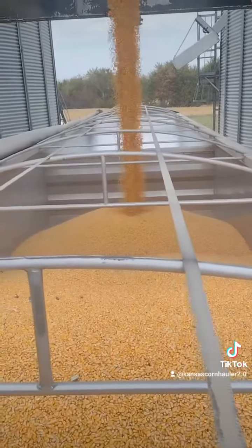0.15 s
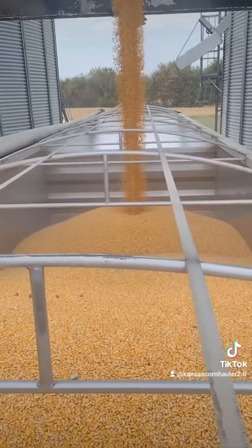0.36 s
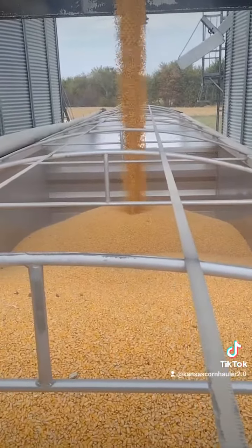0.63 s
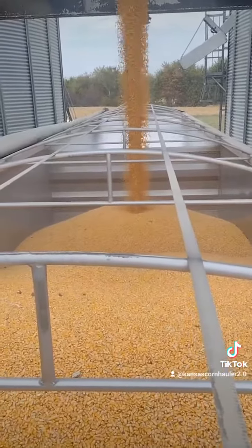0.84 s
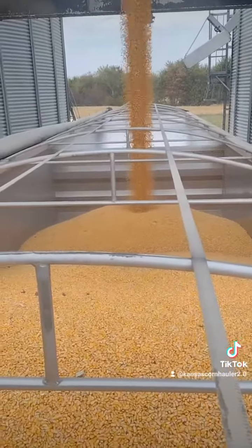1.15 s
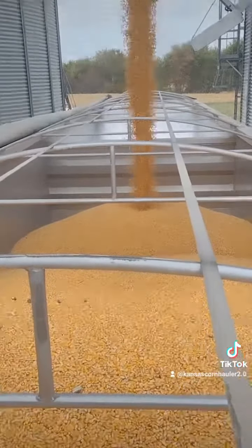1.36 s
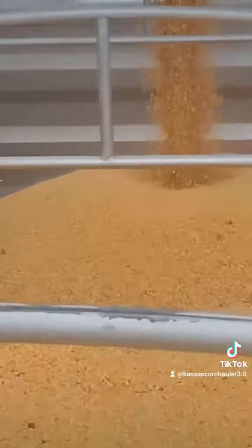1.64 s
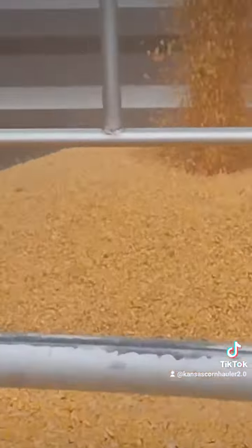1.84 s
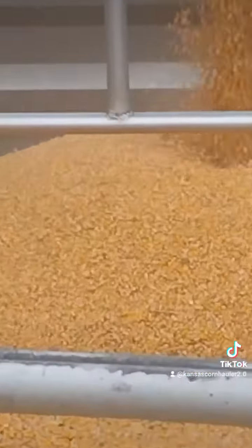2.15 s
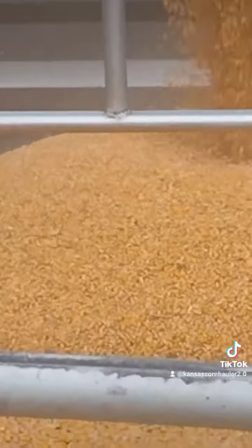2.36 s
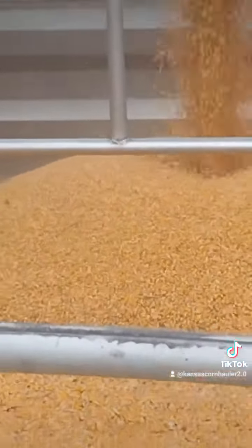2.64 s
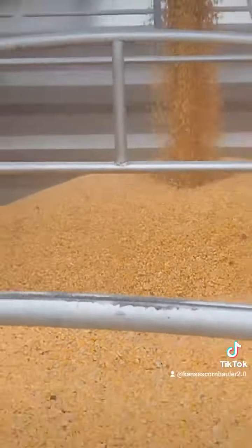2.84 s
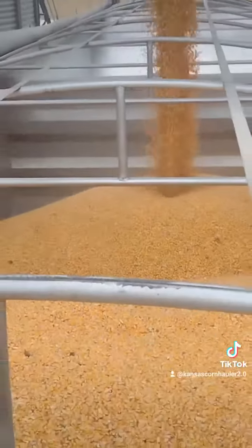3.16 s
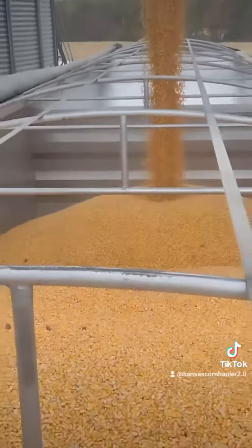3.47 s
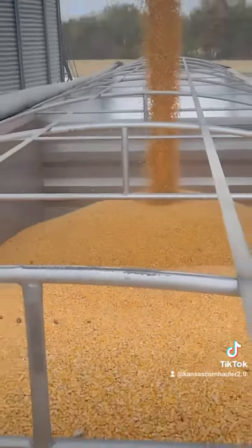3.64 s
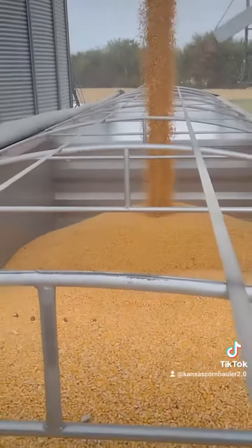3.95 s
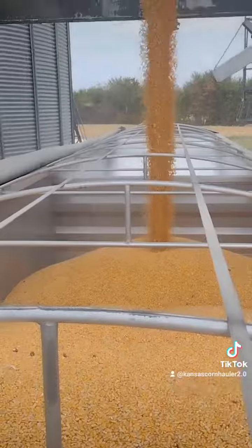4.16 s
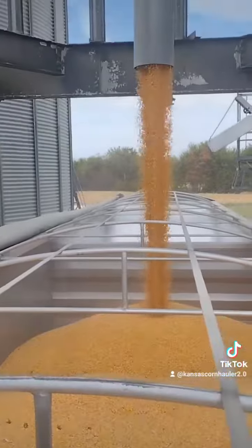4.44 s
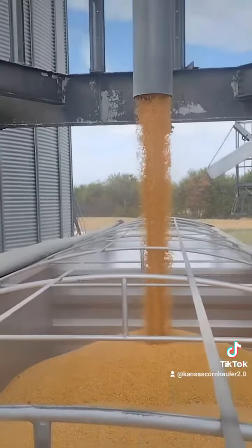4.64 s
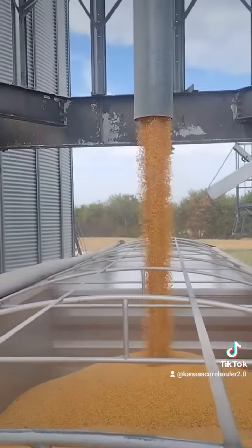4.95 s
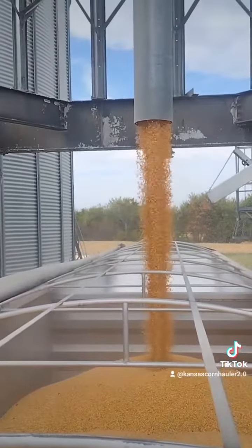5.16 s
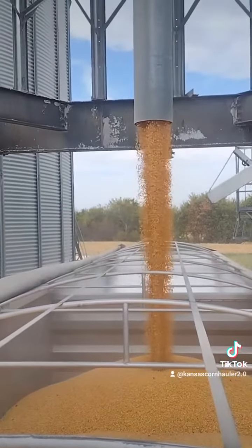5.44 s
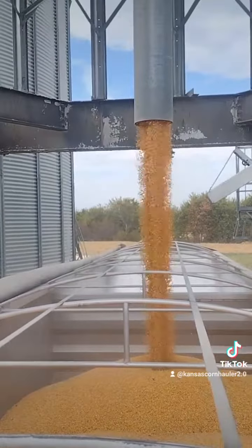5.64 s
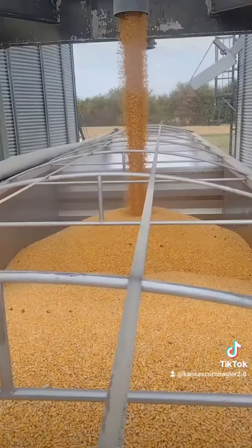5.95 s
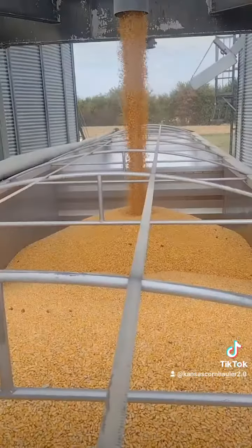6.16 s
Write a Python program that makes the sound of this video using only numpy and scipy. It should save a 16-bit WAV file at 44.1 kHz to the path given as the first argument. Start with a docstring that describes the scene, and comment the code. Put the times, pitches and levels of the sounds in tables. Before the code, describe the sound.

Dry corn kernels pour in a steady rushing hiss onto a heap in a metal trailer, with low engine drone, a brief silence, then a stronger return.

```python
"""Shelled corn falls from an overhead spout onto the heap in a metal grain trailer: kernels click and hiss, the
stream drums the heap and walls, two engines and a conveyor drone behind. The whole scene starts loud with heavy
surges and sinks to a calm level by 1.8 s; stray kernels tick on a rail. Around 4 s the microphone is raised
from the heap towards the spout. At 5.5 s the sound drops out, then it swells back louder. Sources are shaped
noise, random impacts and sines."""
import sys
import numpy as np
from scipy.fft import rfft, irfft, next_fast_len
from scipy.io import wavfile
from scipy.ndimage import map_coordinates

SR = 44100
rng = np.random.default_rng(int(sys.argv[2]) if len(sys.argv) > 2 else 0)


def put_to_file(sound):
    """Save the sound as 16-bit audio at rate SR, in the file named by the first command-line argument."""
    columns = np.atleast_2d(sound).T  # one column per channel
    safe = np.clip(columns, -1, 1)
    whole_steps = np.round(safe * 32767)
    wavfile.write(sys.argv[1], SR, whole_steps.astype(np.int16))


N = 277918

# Spectra of kernels ploughing, clicking and skittering: (frequency [Hz], relative density [dB])
RUSH_SPECTRUM = [(350, -16.5), (560, -1), (800, -0.5), (950, -1.7), (1450, -1.8), (1900, -4.5), (2300, -8),
                 (2800, -8.5), (3400, -16.5), (5000, -39.5)]
PATTER_SPECTRUM = [(1800, -40), (2800, -2), (3400, 0), (4000, 2), (5100, 1), (6000, 1.5), (7000, -3),
                   (10000, -32)]
HISS_SPECTRUM = [(4500, -45.5), (5600, -15), (6100, -6.5), (6750, -3.5), (7600, -4.5), (8600, -2.5),
                 (9700, -4.5), (12000, -1.5), (13500, -0.5), (14400, 0.5), (15200, 1.5)]
RUSH_FLUTTER_DB, PATTER_FLUTTER_DB, HISS_FLUTTER_DB = 0.68, 1.1, 0.62
SWAY_BEFORE_DB, SWAY_AFTER_DB = 1.3, 5.5  # L-R of the finest hiss, before and after the gap


def kernels():
    """Kernels plough into the heap, click on each other and skitter down the slope."""
    flow = wobble(rate_hz=45)  # the stream falls in slightly uneven clumps
    rush = shower(RUSH_SPECTRUM, rate_hz=2000, spread_db=3.0, slide_db=-2)
    rush = rush * amp(level("rush") + RUSH_FLUTTER_DB * flow)
    patter = shower(PATTER_SPECTRUM, rate_hz=2500, spread_db=3.5, slide_db=2.5)
    patter = patter * amp(level("patter") + PATTER_FLUTTER_DB * flow)
    hiss = shower(HISS_SPECTRUM, rate_hz=8000, spread_db=3.5, slide_db=0.0)
    hiss = swayed(hiss * amp(level("hiss") + HISS_FLUTTER_DB * flow))
    coarse = reflections(rush + patter, echo_db=-4, reach_s=0.04, count=16)
    return coarse + reflections(hiss, echo_db=-12.5, reach_s=0.02, count=12)


def swayed(hiss):
    """The shortest waves favour one side or the other as the microphone turns."""
    sway_db = np.where(after_gap(), SWAY_AFTER_DB, SWAY_BEFORE_DB)
    fine = filtered(hiss, lambda hz: np.interp(hz, [10000, 11060, 14100, 15040], [0, 1, 1, 0]))
    return hiss + fine * (amp(np.array([sway_db, -sway_db]) / 2) - 1)


WANDER_MS = 0.35


def reflections(x, echo_db, reach_s, count):
    """Bare metal sides return weak early copies; the hand-held microphone wanders, so the comb moves."""
    out = x.copy()
    hand = wobble(rate_hz=1) * WANDER_MS * SR / 1000  # samples
    echo_gain = amp(echo_db) / np.sqrt(count)
    for side, direct in zip(out, x):
        for place, heading, sign in rng.uniform([0.1, -1, -1], [1, 1, 1], (count, 3)):
            delay = np.rint(place * reach_s * SR + heading * hand).astype(int)
            heard = np.arange(N) - delay
            copy = direct[heard.clip(0, N - 1)] * (heard >= 0)
            side += np.sign(sign) * echo_gain * copy
    return out / np.sqrt(1 + amp(2 * echo_db))


# Spectrum of the falling stream: (frequency [Hz], relative density [dB])
STREAM_SPECTRUM = [(500, -24), (1000, 9), (2000, 3), (3400, -3), (4400, -10.5), (5300, -13), (6500, 2),
                   (9000, 4), (15000, 10)]
# Lag of the left port as the microphone tilts: (time [s], lag [ms])
PORT_LAG = [(0.8, 0.014), (1.5, -0.0059), (3.4, -0.037), (4.0, 0.035), (4.2, 0.095), (4.6, 0.12),
            (5.5, 0.11), (5.86, -0.036)]


def stream():
    """Kernels jostle as they leave the spout; both ports hear the same sound at slightly shifted times."""
    blows = impacts(rate_hz=3700, spread_db=2)[0]
    jostle = unit(filtered(blows, lambda hz: amp(along(STREAM_SPECTRUM, hz))))
    lag_ms, = curves(PORT_LAG)
    left = map_coordinates(jostle, [np.arange(N) - lag_ms * SR / 1000], order=5)
    return amp(level("stream")) * np.array([left, jostle])


# Spectrum of the nearest kernels: (frequency [Hz], relative density [dB])
CRACKLE_SPECTRUM = [(900, -23.5), (1800, -6.5), (2700, 5.5), (3500, -15), (4500, -3), (6500, -1),
                    (10000, -1)]


def crackle():
    """Kernels bouncing off the heap nearby click one by one above the hiss."""
    clicks = impacts(rate_hz=220, spread_db=5)
    return amp(level("crackle")) * spread(clicks, lambda hz: amp(along(CRACKLE_SPECTRUM, hz)))


# Spectra of heap thud and box body: (frequency [Hz], relative density [dB])
HEAP_SPECTRUM = [(20, -14), (40, -21), (50, -15), (60, -10.5), (78, -1), (100, -5), (125, -5), (170, -13),
                 (300, -53.5)]
BODY_SPECTRUM = [(80, -24), (120, -2), (145, -3), (180, 1), (225, -2.5), (280, -2.5), (345, -9.5),
                 (440, -7), (520, -12.5), (650, -22.5), (1000, -49.5)]
SURGE_DRUM = 0.22  # share of a surge's dB that reaches the walls


def trailer():
    """Clumps in the stream thud on the heap and set the metal box drumming."""
    surge_db = surges()
    thud = shower(HEAP_SPECTRUM, rate_hz=500, spread_db=1, slide_db=0.5)
    body = amp(-1.5) * shower(BODY_SPECTRUM, rate_hz=900, spread_db=3.0, slide_db=-1)
    ring = amp(-5.0) * spread(impacts(rate_hz=1200, spread_db=2), walls)
    drum = amp(level("drum") + SURGE_DRUM * surge_db) * (body + ring)
    return amp(level("thud") + surge_db) * thud + drum


# Resonances of panels and hold: (centre [Hz], width [Hz], relative level [dB])
WALL_MODES = [(108, 15, -6.5), (147, 15, -2.5), (231.4, 16, -2.5), (292, 12, -4.5), (386.4, 24, -5),
              (440, 23.3, -2.5)]


def walls(hz):
    """Summed band-pass resonances of the trailer's panels and hold."""
    total = 0
    for centre_hz, width_hz, db in WALL_MODES:
        damping = 1j * hz * width_hz
        total = total + amp(db) * damping / (centre_hz ** 2 - hz ** 2 + damping)
    return total


# Momentary thickening of the stream: (time [s], length between 1/e points [s], extra thud [dB])
SURGES = [(0.117, 0.14, 5), (0.338, 0.09, 10.5), (0.436, 0.068, 6.5), (0.645, 0.19, 1.5), (2.2, 0.09, 6.5),
          (2.484, 0.059, 11), (3.6, 0.25, 2), (3.862, 0.3, 9), (5.445, 0.08, 7), (6.242, 0.15, 9)]


def surges():
    """Each heavy clump is a bell-shaped swell, in dB."""
    t = np.arange(N) / SR
    return sum(db * np.exp(-(2 * (t - s) / length_s) ** 2) for s, length_s, db in SURGES)


# Dense clumps knocking on the heap: (time [s], pitch [Hz], level before attack and decay [dB])
CLUMPS = [(0.044, 163, -6), (0.363, 162, -13), (2.191, 144, -13), (2.493, 89, -18), (3.262, 207, -15.5),
          (3.651, 146, -15), (3.871, 81, -11), (6.075, 219, -11.5), (6.222, 161, -4.5), (6.276, 155, -5.5)]
CLUMP_ATTACK_S, CLUMP_T60_S = 0.0015, 0.071


def clumps():
    """A dense clump lands with one soft, quickly damped knock: a decaying sine."""
    out = np.zeros(N + SR)
    t = np.arange(SR // 5) / SR
    attack = 1 - np.exp(-t / CLUMP_ATTACK_S)
    for s, hz, db in CLUMPS:
        decay = amp(db - 60 * t / CLUMP_T60_S)
        out[round(s * SR):][:len(t)] += decay * attack * np.sin(2 * np.pi * hz * t)
    return out[:N]


# Stray kernels on a rail: (time [s], pitch [Hz], level before attack and decay [dB])
TICKS = [(2.3266, 11200, -14), (2.3974, 11000, -14), (2.9084, 10900, -18), (3.9345, 11000, -16.5)]
TICK_ATTACK_S, TICK_T60_S = 0.00043, 0.0095


def ticks():
    """A stray kernel glances off a rail with a tiny high ring."""
    out = np.zeros(N)
    for s, hz, db in TICKS:
        t = np.maximum(np.arange(N) / SR - s, 0)
        attack = 1 - np.exp(-t / TICK_ATTACK_S)
        out += amp(db - 60 * t / TICK_T60_S) * attack * np.sin(2 * np.pi * hz * t)
    return out


# Machine tones; balance depends on where one stands:
# (multiple of the cycle rate, level before the gap [dB], level after it [dB])
FAST_ENGINE = [(4, -43, -49), (5, -44, -44), (6, -42, -42), (7, -41.5, -41), (9, -40.5, -39),
               (10, -40, -38), (14, -49, -47), (16, -47, -45), (18, -49.5, -50), (22, -55, -58),
               (26, -55, -48), (30, -50.5, -55), (32, -52, -58), (34, -55, -49), (40, -50.5, -52),
               (43, -64, -50.5), (79, -62, -49), (86, -62, -53)]
SLOW_ENGINE = [(4, -53, -56), (12, -47, -43), (13, -37, -33.5), (14, -45.5, -46), (15, -44.5, -45),
               (16, -37.5, -37), (17, -48.5, -47), (18, -43, -43), (21, -51, -50), (29, -52, -55),
               (32, -54, -54), (36, -52, -57)]
CONVEYOR = [(3, -42, -42), (10, -44.5, -42.5), (40, -52, -54)]
FAST_HZ, SLOW_HZ, CONVEYOR_HZ = 15.01, 12.76, 26.03  # cycle rates
ENGINE_DRIFT, CONVEYOR_DRIFT = 0.0015, 0.0022  # share of the speed
HUM_DB_PER_DB = 1  # gain per dB of scene loudness


def machinery():
    """Two engines throb against each other under the conveyor's whine, sinking and rising with the scene."""
    fast = machine(FAST_HZ, FAST_ENGINE, ENGINE_DRIFT)
    slow = machine(SLOW_HZ, SLOW_ENGINE, ENGINE_DRIFT)
    conveyor = machine(CONVEYOR_HZ, CONVEYOR, CONVEYOR_DRIFT)
    return (fast + slow + conveyor) * amp(HUM_DB_PER_DB * loudness_db())


TONE_DRIFT_DB, PORT_PHASE_RAD = 1.5, 0.38


def machine(cycle_hz, orders, speed_drift):
    """Tones locked to one machine's speed; each drifts in level and in phase at the two moving ports."""
    turns = np.cumsum(cycle_hz * (1 + speed_drift * wobble(rate_hz=1.99))) / SR
    total = np.zeros((2, N))
    for multiple, before_db, after_db in orders:
        phase = 2 * np.pi * (multiple * turns + rng.random())
        tone_db = np.where(after_gap(), after_db, before_db) + TONE_DRIFT_DB * wobble(rate_hz=1.936)
        apart = PORT_PHASE_RAD * wobble(rate_hz=1)
        total += amp(tone_db) * np.sqrt(2) * np.sin([phase + apart, phase - apart])
    return total


# Layers: (level when calm [dB], gain per dB of scene loudness [dB/dB], gain once the microphone is raised [dB],
# gain after the gap [dB])
LAYERS = {"thud": (-33.5, 0.88, -7.5, 1.5), "drum": (-30.5, 0.9, -1, 1.5),
          "rush": (-34.5, 0.8234, 0.5, 1.8), "patter": (-40, 1.6838, -2, 3), "hiss": (-24, 1, -0.9, 0.5),
          "crackle": (-43.5, 0.82, -3, 2), "stream": (-36.5, 0.74, 6.5, -2.5)}
RAISE_S = (3.76, 4.46)  # microphone goes from heap towards spout: start, end


def level(layer):
    """Layer level in dB: follows the scene's loudness and shifts as the microphone is raised or moved."""
    calm_db, grows, raised_db, moved_db = LAYERS[layer]
    raised = np.interp(np.arange(N) / SR, RAISE_S, [0, 1])
    return calm_db + grows * loudness_db() + raised_db * raised + moved_db * after_gap()


# Loudness of the whole scene: (time [s], level [dB])
LOUDNESS = [(0.0, -24.5), (0.33, -22.5), (0.6, -23), (0.78, -22.5), (1.0, -24.5), (1.25, -27), (1.47, -30.5),
            (1.8, -31), (5.863, -31), (6.13, -23.5), (6.3, -25)]
CALM_DB = -31


def loudness_db():
    """How far the scene's loudness stands above its calm level."""
    pour_db, = curves(LOUDNESS)
    return pour_db - CALM_DB


GAP_START_S, GAP_END_S = 5.516, 5.863


def after_gap():
    """True from the moment the sound returns."""
    return np.arange(N) / SR > GAP_END_S


def shower(spectrum, rate_hz, spread_db, slide_db):
    """Single impacts over the smooth noise of kernels sliding, in one colour."""
    sliding = amp(slide_db) * rng.standard_normal((2, N))
    blows = impacts(rate_hz, spread_db) + sliding
    return spread(blows, lambda hz: amp(along(spectrum, hz)))


def impacts(rate_hz, spread_db):
    """Two unrelated showers of blows at random moments, with clipped log-normal sizes."""
    struck = rng.random((2, N)) < rate_hz / SR
    sizes = amp(spread_db * rng.standard_normal((2, N)).clip(-2.5, 2.5))
    return unit(struck * sizes * rng.choice([-1, 1], (2, N)))


# Left-right likeness: (frequency [Hz], correlation [-1 to 1])
LIKENESS = [(60, 0.28), (130, 0.76), (260, 0.91), (600, 0.54), (900, 0.25), (1300, -0.33), (2000, 0.28),
            (2800, 0.16), (3600, 0.36), (4800, -0.056), (5600, 0.21), (8000, -0.017), (15000, 0.04)]


def spread(pair, response):
    """Colour two unrelated signals and mix them to left and right, as alike as the table says."""
    def mid_side(hz):
        angle = np.arccos(np.clip(along(LIKENESS, hz), -1, 1)) / 2
        return response(hz) * np.array([np.cos(angle), np.sin(angle)])
    mid, side = filtered(pair, mid_side)
    return unit(np.array([mid + side, mid - side]))


def amp(db):
    """Decibels to gain."""
    return 10 ** (np.asarray(db) / 20)


def unit(x):
    """Scale to rms 1."""
    return x / np.sqrt(np.mean(x ** 2) + 1e-20)


def along(points, hz):
    """(Hz, value) points read on a log axis."""
    f, v = np.transpose(points)
    return np.interp(np.log(hz + 1), np.log(f + 1), v)


def curves(rows):
    """One value per sample for each column after the time."""
    s, *cols = np.transpose(rows)
    return [np.interp(np.arange(N) / SR, s, c) for c in cols]


def wobble(rate_hz):
    """A smooth random curve through rate_hz knots a second."""
    knots = rng.standard_normal(int(N * rate_hz / SR) + 4)
    return map_coordinates(knots, [np.arange(N) * rate_hz / SR])


def filtered(x, response):
    """x times a response of frequency."""
    size = next_fast_len(N + SR // 2)
    return irfft(rfft(x, size) * response(np.fft.rfftfreq(size, 1 / SR)), size)[..., :N]


# Lean to one side: (frequency [Hz], L-R [dB])
LEAN = [(60, 1), (200, 1.6), (700, 0.3), (1000, -0.5), (1450, -5), (1900, -1.5), (2300, 1), (3600, -1),
        (6500, -0.6), (9600, 0.5), (13000, -1.8), (15000, -0.5)]


def scene():
    """Corn, trailer and machinery, each pitch leaning a little to one side."""
    corn = kernels() + stream() + crackle()
    mix = corn + trailer() + clumps() + ticks() + machinery()
    return filtered(mix, lambda hz: amp(np.array([along(LEAN, hz), -along(LEAN, hz)]) / 2))


LOW_CUT_HZ, TOP_HZ = 47, 15560
FADE_OUT_S, FADE_IN_S, FADE_IN_FROM = 0.0174, 0.085, 0.309  # last: starting gain


def record(dry):
    """The microphone sheds deep bass, the sound cuts out and fades back in, the top is band-limited."""
    thinned = filtered(dry, lambda hz: hz ** 2 / np.sqrt(hz ** 4 + LOW_CUT_HZ ** 4))
    t = np.arange(N) / SR
    drop = np.clip((GAP_START_S - t) / FADE_OUT_S + 0.5, 0, 1)
    swell = after_gap() * np.interp(t, [GAP_END_S, GAP_END_S + FADE_IN_S], [FADE_IN_FROM, 1])
    return filtered(thinned * (drop + swell), lambda hz: np.clip((TOP_HZ - hz) / 120 + 0.5, 0, 1))


dry = scene()
out = record(dry)
put_to_file(out)
```